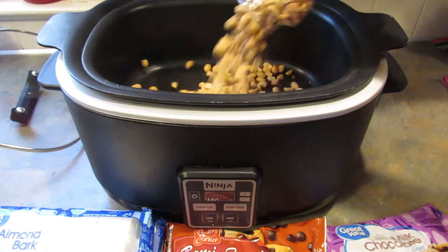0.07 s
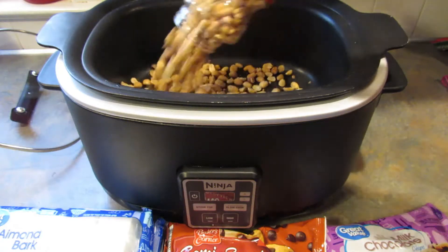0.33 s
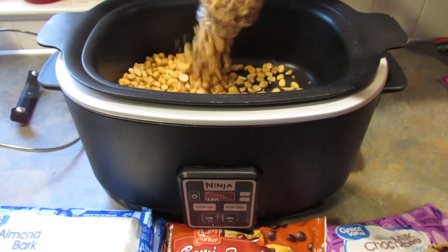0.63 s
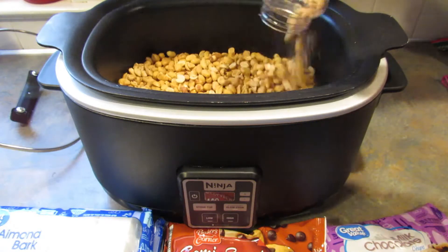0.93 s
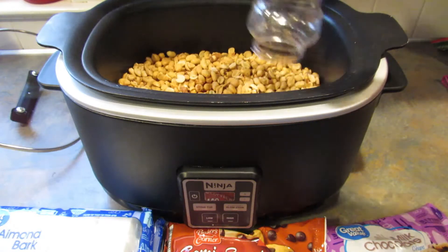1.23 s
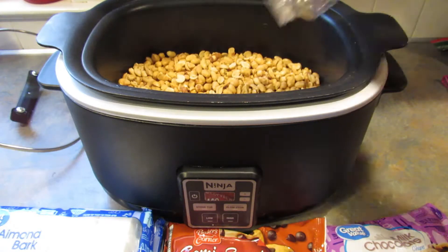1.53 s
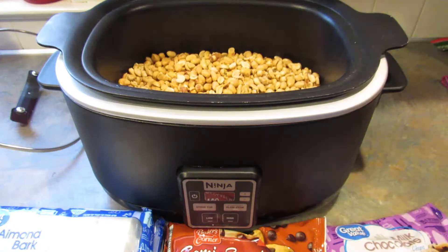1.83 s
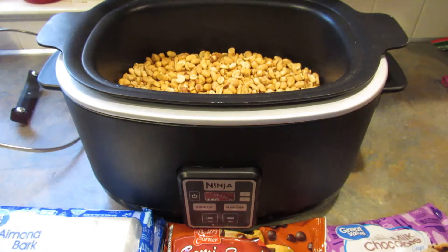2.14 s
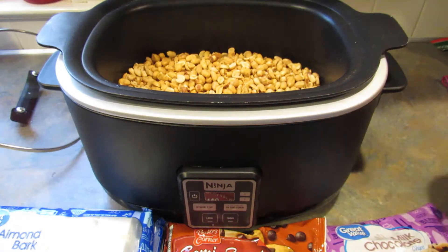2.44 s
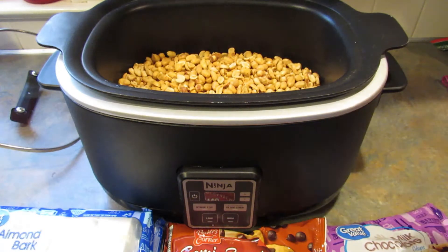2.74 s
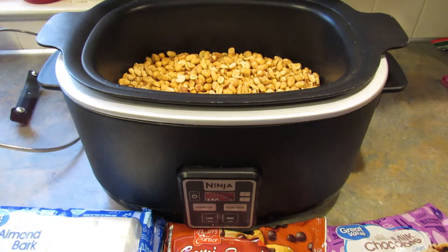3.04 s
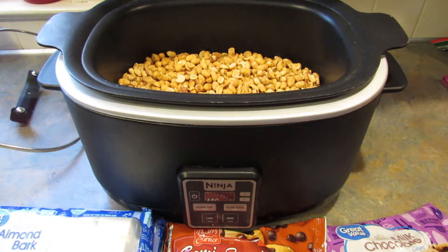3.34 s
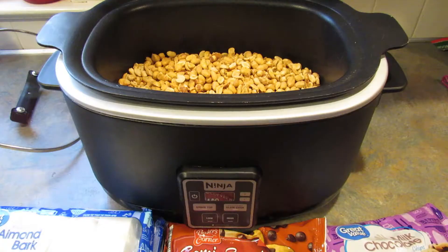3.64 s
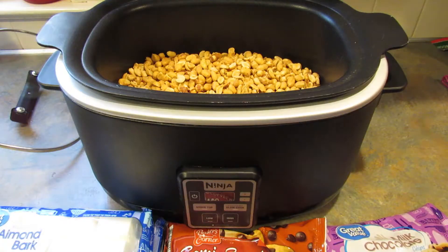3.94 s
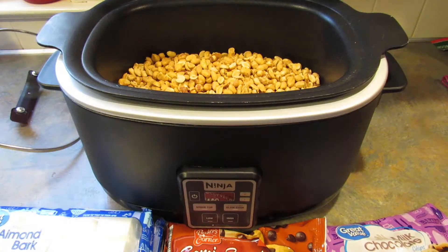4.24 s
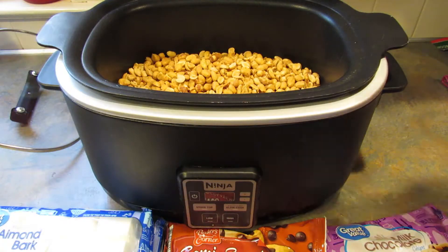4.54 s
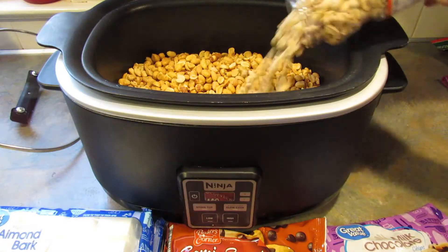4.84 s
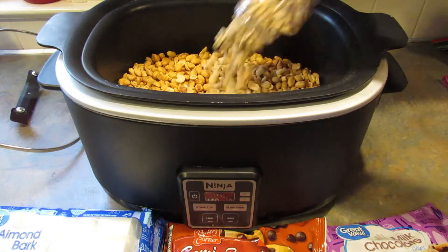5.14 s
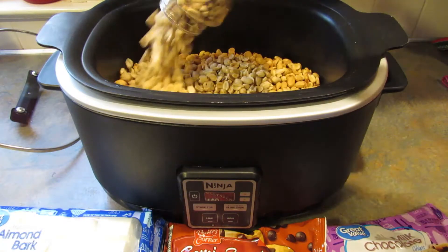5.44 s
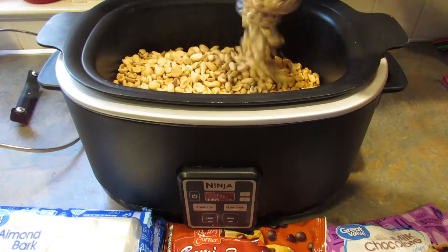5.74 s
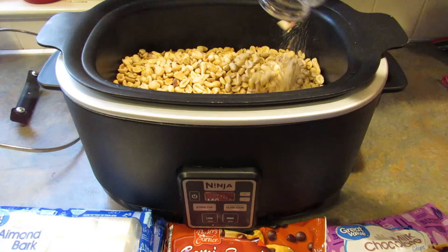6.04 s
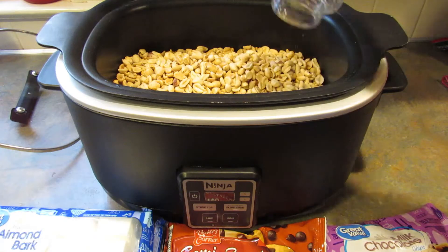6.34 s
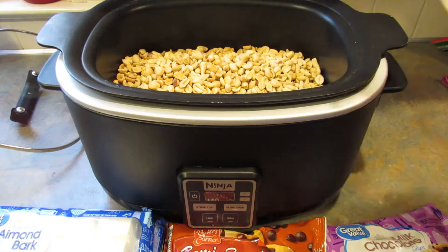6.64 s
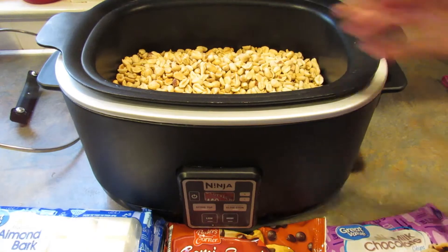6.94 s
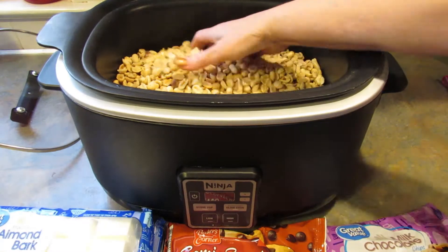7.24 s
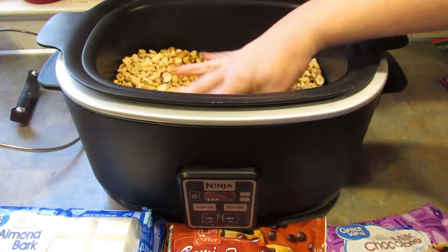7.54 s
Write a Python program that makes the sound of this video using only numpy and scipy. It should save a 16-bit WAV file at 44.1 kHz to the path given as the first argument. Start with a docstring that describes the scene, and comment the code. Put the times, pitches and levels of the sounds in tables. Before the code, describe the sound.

Close to a metal pot in a small, faintly humming kitchen, a stream of peanuts clatters in and trails off. An empty plastic jar is set down with a few hollow knocks, followed by quiet rubbing, plastic clicks and the brief hiss of a seal tearing. More peanuts rush in on top of the first, and finally a hand spreads the heap in short, rustling pushes.

```python
"""Shelled peanuts pour from a jar into a metal cooker pot, drumming on its floor and ringing its wall.
The empty plastic jar knocks on the counter with a hollow boom. Fingers rub the next jar, its lid snaps
and its seal tears with a hiss. The second pour follows, the banked nuts shortening the wall's ring.
Last, a hand spreads the heap. All is heard close to the pot, in a small kitchen with a mains hum."""
import sys
import numpy as np
from scipy import signal
from scipy.fft import rfft, irfft, next_fast_len
from scipy.io import wavfile
from scipy.ndimage import map_coordinates

SR = 44100
rng = np.random.default_rng(int(sys.argv[2]) if len(sys.argv) > 2 else 0)


def output_pcm(signal):
    """Save a mono or channel-first signal as 16-bit PCM at the path in sys.argv[1].

    Samples are clipped to [-1, 1] before scaling.
    """
    pcm = np.clip(np.atleast_2d(signal).T, -1, 1) * 32767
    wavfile.write(sys.argv[1], SR, np.round(pcm).astype(np.int16))


N = 338688
TOUCH_S = 7.143  # the hand lands on the heap
TOP_HZ = 15250  # microphone band limit

# Jars tipped out. Each row: start, fullest moment and running out in seconds, rattle at the fullest in dB,
# swell and fade in dB per second, crisp top re rattle in dB.
POURS = [(-0.08, 0.644, 0.97, -22.5, 10, 78, -1), (4.806, 5.577, 5.985, -22, 13.5, 107.5, -6)]
# Modes of the pot's wall. Each row: frequency in Hz, relative level in dB, T60 in seconds.
WALL_MODES = [(1040, 7, 0.12), (1365, 1, 0.13), (1620, 4.5, 0.08), (2560, -1.5, 0.11), (2840, -3.5, 0.07),
              (3105, -1, 0.042), (4890, -2, 0.025), (7280, -1.5, 0.07)]


def peanuts():
    """Nuts collide in clumps: they drum on the pot's floor, rattle in its hollow and tick on each other."""
    # Collision spectrum. Each row: frequency in Hz, relative density in dB.
    spectrum = [(60, -24), (140, -5), (210, -8.5), (290, -5.5), (345, 5), (410, 1), (480, -11), (690, -20),
                (830, -4.5), (1700, -3.5), (2600, -2.5), (3500, -7.5), (7000, -9.5), (10000, -13.5),
                (15000, -23.5)]
    hail = grains(per_second=3800, scatter_db=3.6, cycles=2.2, spread=.85)
    hail += amp(-2.5) * stereo_noise(N, width=.09)
    clumps = amp(1.4 * wobble(110) + .5 * wobble(30))
    hail = coloured(hail * clumps, spectrum)
    below = lambda hz, edge_hz: 1 / (1 + (hz / edge_hz) ** 8)
    drum = unit(filtered(hail, lambda hz: below(hz, 730)))
    rattle = unit(filtered(hail + pot_air(hail), lambda hz: below(hz, 3670) - below(hz, 490)))
    crisp = unit(filtered(hail, lambda hz: 1 - below(hz, 3280)))
    level, top = np.add(pouring(), spreading())
    ticks = level * rattle + top * crisp
    hand = np.arange(N) / SR >= TOUCH_S  # shoves the whole heap and muffles the floor
    shove = amp(-5.5) * hand * level * burst(N, 132, octaves=0.51, width=0.51)
    floor = amp(-6 - 3.5 * hand) * level * drum
    return ticks + floor + shove + amp(-26) * pot_ring(ticks)


def pouring():
    """Gains of rattle and crisp top: each stream opens, swells, thins once the bulk is out, and dies."""
    # The stream falters at the jar's mouth. Each row: time and half length in seconds, dip in dB.
    stalls = [(1.057, 0.019, 7), (5.148, 0.013, 14)]
    open_s, open_db = 0.086, 9.5  # the first nuts slide over the rim
    thin_s, thin_db = 0.13, 10
    dulling_db_per_db = 0.3  # nuts in a thick stream cushion each other
    settle_db_per_s = 10  # the last nuts roll to rest and lose their top
    t, level, top = np.arange(N) / SR, np.zeros(N), np.zeros(N)
    stall_db = sum(db * np.exp(-((t - s) / half_s) ** 2) for s, half_s, db in stalls)
    for start_s, fullest_s, empty_s, db, swell_db_per_s, fade_db_per_s, crisp_db in POURS:
        opening = ramp(start_s, open_s)
        stream_db = -swell_db_per_s * np.maximum(fullest_s - t, 0) - thin_db * ramp(fullest_s, thin_s)
        ends_db = open_db * (opening - 1) - fade_db_per_s * since(empty_s)
        gain = (t >= start_s) * amp(db + stream_db + ends_db - stall_db)
        top_db = crisp_db - dulling_db_per_db * stream_db - settle_db_per_s * since(empty_s)
        level += gain
        top += gain * opening * amp(top_db)
    return level, top


def spreading():
    """Gains of rattle and crisp top under the hand: each push builds and eases."""
    # Pushes through the heap. Each row: hardest moment in seconds, rattle in dB, top re rattle in dB.
    pushes = [(7.171, -34.5, -8), (7.328, -29.5, 3), (7.52, -41, -7), (7.66, -35.5, -3)]
    rise_db_per_s, fall_db_per_s = 153, 152
    t, levels, tops = np.arange(N) / SR, [], []
    for s, db, crisp_db in pushes:
        gain = (t >= TOUCH_S) * amp(db - rise_db_per_s * np.maximum(s - t, 0) - fall_db_per_s * since(s))
        levels.append(gain)
        tops.append(gain * amp(crisp_db))
    return np.linalg.norm(levels, axis=0), np.linalg.norm(tops, axis=0)


def strikes():
    """A clump chatters against the wall, a single nut cracks once, and the wall rings on."""
    # Clumps hitting the pot. Each row: start in seconds, relative level in dB, centre in Hz, hold in seconds.
    clumps = [(0.047, -6, 6670, 0.012), (0.068, -6.5, 7000, 0.0094), (0.53, -15.5, 2310, 0.02),
              (1.091, -12, 4400, 0.0047), (1.114, -17.5, 5270, 0.008), (1.153, -17.5, 3570, 0.018),
              (1.195, -23.5, 4240, 0.021), (4.879, -17, 7100, 0.014), (4.929, -12.5, 2870, 0.0059),
              (5.121, -12, 1980, 0.013), (5.186, -9.5, 3160, 0.023), (5.264, -13, 2420, 0.014),
              (5.532, -12.5, 2360, 0.0188), (5.897, -13, 2150, 0.0054), (7.149, -17.5, 3480, 0.049),
              (7.454, -12.5, 2960, 0.075), (7.465, -19, 500, 0.0146), (7.509, -10, 7000, 0.0038)]
    # Single hard hits. Each row: start in seconds, relative level in dB, centre in Hz.
    hits = [(0.7433, -7, 6100), (5.586, -7, 2440), (5.7418, -13.5, 2070), (5.9478, -16.5, 3200),
            (6.255, -23, 3700), (6.27, -23, 2800), (7.455, -12, 3070), (7.586, -15.5, 4000)]
    out, t = np.zeros((2, N)), np.arange(SR // 4) / SR
    for s, db, centre_hz, hold_s in clumps:
        fade_db = -60 * np.maximum(t - hold_s, 0) / 0.057
        octaves = np.clip(0.16 * (centre_hz / 1600) ** 2.65, .14, .85)  # harder hits: higher and broader
        add(out, s, amp(db - 13.5 + fade_db) * burst(len(t), centre_hz, octaves, width=0.31))
    crack = amp(-60 * t / 0.0027) + amp(-2.5 - 60 * t / 0.039)
    for s, db, centre_hz in hits:
        add(out, s, amp(db - 9.5) * crack * burst(len(t), centre_hz, octaves=0.72, width=0.15))
    banked = np.arange(N) / SR > POURS[1][0]  # nuts damp the wall from the second pour on
    return out + amp(-2) * (pot_ring(out * ~banked) + pot_ring(out * banked, t60_scale=0.35))


def wall_slides():
    """Nuts slide along the wall and swell one mode in uneven nudges; it then dies at its own speed."""
    # Each row: start and length in seconds, level in dB, mode frequency in Hz.
    slides = [(0.44, 0.12, -30, 2560), (0.813, 0.15, -34, 1030), (1.09, 0.15, -43, 1045),
              (7.465, 0.05, -24.5, 1601), (7.585, 0.008, -30, 1607)]
    out, t = np.zeros(N), np.arange(N) / SR
    mode_hz, _, mode_t60_s = np.transpose(WALL_MODES)
    for s, length_s, db, hz in slides:
        envelope = stroke(s, length_s, rise_s=length_s / 2, t60_s=np.interp(hz, mode_hz, mode_t60_s))
        out += amp(db) * envelope * np.sin(2 * np.pi * hz * t + 1.2 * wobble(45))
    return out * amp(2.5 * wobble(60))


def pot_ring(x, t60_scale=1):
    """The wall's modes, driven by x; loose nuts blur their pitch."""
    t = np.arange(SR // 2) / SR
    free, damped = np.zeros((2, len(t)))
    for hz, db, t60_s in WALL_MODES:
        tone = np.cos(2 * np.pi * hz * t + .5 * wobble(110)[:len(t)])
        free += amp(db - 60 * t / t60_s) * tone
        damped += amp(db - 60 * t / (t60_s * t60_scale)) * tone
    return signal.fftconvolve(x, damped[None] / np.linalg.norm(free), axes=1)[:, :N]


def pot_air(x):
    """Each resonance of the air in the pot comes and goes as the nuts land in new places."""
    # Each entry: an air resonance in Hz.
    modes_hz = [1392, 1768, 2096, 2585]
    width_hz = 90
    return sum(amp(-3 + 4 * wobble(9)) * resonate(x, [(hz, width_hz, 0)]) for hz in modes_hz)


def jar_knocks(boom_hz=345, boom_s=0.05):
    """The empty jar booms at one pitch until the hand damps it; the counter thumps and the rim clacks."""
    # Bumps on the counter. Each row: start in seconds, boom in dB, thump in dB, thump pitch in Hz,
    # clack in dB, clack pitch ratio.
    knocks = [(2.328, -36.5, -35, 189, -36, 0.94), (2.369, -25, -30, 130, -31, 0.9),
              (2.544, -9, -34, 190, -21, 1.04), (2.655, -9, -24.5, 157, -12, 0.984),
              (2.674, -42, -21.5, 240, -16, 0.73), (6.766, -57.5, -27.5, 195, -39.5, 0.6),
              (6.848, -39.5, -29.5, 179, -32, 0.98)]
    # Resonances of the clack. Each row: frequency and width in Hz, gain per pass in dB.
    clack_modes = [(538, 260, 5), (805, 60, 4.5), (1140, 207, 5.5), (1500, 520, 1.5), (2100, 500, 1),
                   (3850, 1630, -4.5), (5500, 1360, -9), (8200, 6400, -3)]
    low, clacks, t = np.zeros((2, N)), np.zeros((2, N)), np.arange(SR // 4) / SR
    swell = (1 - np.exp(-t / 0.0012)) * np.exp(-(t / boom_s) ** 3.7)
    for s, boom_db, thump_db, thump_hz, clack_db, pitch in knocks:
        add(low, s, amp(boom_db) * swell * np.sin(2 * np.pi * boom_hz * t))
        add(low, s, amp(thump_db - 60 * t / 0.14) * np.sin(2 * np.pi * thump_hz * t))
        add(low, s, amp(thump_db - 7 - 60 * t / 0.4) * burst(len(t), thump_hz, octaves=0.51, width=0.64))
        modes = [(hz * pitch, width_hz, db) for hz, width_hz, db in clack_modes]
        clack = unit(resonate(resonate(stereo_noise(len(t), width=0.45), modes), modes))
        add(clacks, s, amp(clack_db - 60 * t / 0.074) * clack)
    clacks = filtered(clacks, lambda hz: 1 / np.sqrt(1 + (hz / 9000) ** 6))  # soft plastic: little top
    return low, clacks * amp([[-1.5], [1.5]])


def finger_rubs():
    """Fingers take hold of a jar, rub it with an uneven grip and let go."""
    # Each row: start and length in seconds, level in dB.
    rubs = [(1.862, 0.22, -56), (3.11, 0.066, -39.5), (3.277, 0.526, -44.5), (4.096, 0.12, -44),
            (4.462, 0.14, -51.5), (4.718, 0.07, -42), (6.817, 0.097, -50)]
    # Friction spectrum. Each row: frequency in Hz, relative density in dB.
    spectrum = [(340, 2), (690, -5), (950, 5.5), (2200, 4.5), (3500, -2), (8000, -3.5), (15000, -13.5)]
    friction = grains(per_second=2500, scatter_db=3, cycles=1, spread=.6) + stereo_noise(N, width=.2)
    grip = amp(2 * wobble(45))
    level = sum(amp(db) * stroke(s, length_s, rise_s=0.036, t60_s=0.24) for s, length_s, db in rubs)
    return level * unit(coloured(friction * grip, spectrum))


def seal_peel(start_s=3.478, length_s=0.31, sag_db_per_s=6.5):
    """The seal gives at once with a hiss, then peels ever more easily."""
    # Hiss spectrum. Each row: frequency in Hz, relative density in dB.
    spectrum = [(690, -29.5), (1000, -12), (2200, 4), (3800, -10.5), (8000, 0), (15000, -9.5)]
    envelope = stroke(start_s, length_s, rise_s=0.005, t60_s=0.064)
    hiss = unit(coloured(stereo_noise(N, width=1), spectrum))
    return amp(-38.5 - sag_db_per_s * since(start_s)) * envelope * hiss


def jar_snaps(crack_t60_s=0.003, flutter_t60_s=0.066):
    """The plastic cracks sharply, flutters and rings the full jar's shell."""
    # Snaps and taps of jar, lid and seal. Each row: start in seconds, relative level in dB, centre in Hz,
    # breadth in octaves.
    snaps = [(2.89, -26.5, 1850, 0.3), (3.086, -25.5, 7060, 7.2), (3.135, -20.5, 3950, 1.8),
             (3.158, -14.5, 3520, 1.4), (3.478, -9, 7000, 4), (3.877, -19.5, 1400, 1.3),
             (3.93, -19.5, 1190, 1.9), (4.048, -13, 4400, 1.2), (4.054, -14.5, 2720, 0.15),
             (4.153, -25.5, 450, 1.7), (4.452, -29, 1850, 0.66), (4.552, -22, 3630, 0.73),
             (4.586, -23, 2000, 0.5), (4.725, -21.5, 1850, 1.04), (4.837, -17, 2190, 0.5),
             (6.672, -32.5, 4560, 0.069), (6.831, -28.5, 2280, 0.23), (6.871, -28, 1950, 6.6),
             (6.92, -29, 2370, 0.027)]
    # Resonances of the full jar. Each row: frequency and width in Hz, gain in dB.
    shell_modes = [(1150, 58, 8), (2660, 89, 0.5), (2930, 54, -4), (4510, 27, -14), (6060, 330, -2.5)]
    out, t = np.zeros((2, N)), np.arange(SR // 4) / SR
    decay = amp(-60 * t / crack_t60_s) + amp(-60 * t / flutter_t60_s)
    for s, db, centre_hz, octaves in snaps:
        add(out, s, amp(db - 13) * decay * burst(len(t), centre_hz, octaves, width=0.5))
    return out + resonate(out, shell_modes)


def kitchen(x, predelay_samples=200):
    """Reverberation in which each frequency dies at its own speed."""
    # Room decay. Each row: frequency in Hz, T60 in seconds.
    t60_s = [(600, 0.47), (1600, 0.56), (12000, 0.37)]
    hz, t, bins = signal.stft(stereo_noise(SR // 2, width=0.29), SR, nperseg=256)
    tail = signal.istft(bins * amp(-60 * t / along(t60_s, hz)[:, None]), SR, nperseg=256)[1]
    tail = np.pad(tail / np.linalg.norm(tail[0]), ((0, 0), (predelay_samples, 0)))
    return signal.fftconvolve(x, tail, axes=1)[:, :N]


def background():
    """An appliance hums over faint room air."""
    # Hum partials; the close pair throbs. Each row: frequency in Hz, rms level in dB.
    partials = [(64.1, -53.5), (120, -48), (127.4, -62.5), (240, -63.5)]
    # Room air spectrum. Each row: frequency in Hz, relative density in dB.
    spectrum = [(30, -22), (130, -12), (400, -10), (690, -26), (850, -19.5), (4000, -36), (10000, -36),
                (15000, -44)]
    t = np.arange(N) / SR
    hum = sum(amp(db) * np.sin(2 * np.pi * hz * t + 0.394 * wobble(4.3)) for hz, db in partials)
    air = unit(coloured(stereo_noise(N, width=1), spectrum))
    return np.sqrt(2) * hum + amp(-51) * air


def grains(per_second, scatter_db, cycles, spread):
    """Tiny collisions, each a damped sine with its own pitch, size and place; white on average."""
    when, pitch, strength, place = rng.random((int(per_second * N / SR), 4)).T[:, :, None]
    hz, t = 150 * 100 ** pitch, np.arange(160) / SR
    life_s = np.minimum(cycles / hz, t[-1] / 3)
    size = amp(-scatter_db * np.log(1 - .98 * strength)) * np.sqrt(hz / life_s)
    pings = size * np.sin(2 * np.pi * hz * t) * np.exp(-t / life_s)
    pan = spread * (2 * place - 1) * np.sqrt(hz / TOP_HZ)  # short waves are the most directional
    index = ((when * N).astype(int) + np.arange(len(t))).ravel()
    channels = [np.bincount(index, (pings * (1 + side * pan)).ravel())[:N] for side in (-1, 1)]
    return unit(np.array(channels))


def burst(size, centre_hz, octaves, width):
    """Stereo noise of rms 1 in a spectral hump."""
    hump = lambda hz: 1 / (1 + (np.log2((hz + 1) / centre_hz) / octaves) ** 2)
    return unit(filtered(stereo_noise(size, width), lambda hz: hump(hz) / np.sqrt(1 + (hz / 11000) ** 4)))


def stereo_noise(size, width):
    """White noise; width is the ratio of side to mid."""
    mid, side = rng.standard_normal((2, size))
    return np.array([mid + width * side, mid - width * side])


def wobble(knots_per_s):
    """A smooth random curve."""
    return map_coordinates(rng.standard_normal(4096), [np.arange(N) * knots_per_s / SR], mode="wrap")


def filtered(x, response):
    """x times a response of frequency."""
    n = x.shape[-1]
    m = next_fast_len(n + SR // 4)
    return irfft(rfft(x, m) * response(np.fft.rfftfreq(m, 1 / SR)), m)[..., :n]


def coloured(x, spectrum):
    """x shaped by (Hz, dB) points."""
    return filtered(x, lambda hz: amp(along(spectrum, hz)))


def resonate(x, modes):
    """x through a set of (Hz, width Hz, dB) resonances."""
    band = lambda f, hz, width_hz: 1j * f * width_hz / (hz * hz - f * f + 1j * f * width_hz)
    return filtered(x, lambda f: sum(amp(db) * band(f, hz, width_hz) for hz, width_hz, db in modes))


def along(points, hz):
    """(Hz, value) points read on a log axis."""
    knots_hz, values = np.transpose(points)
    return np.interp(np.log(hz + 1), np.log(knots_hz), values)


def stroke(start_s, length_s, rise_s, t60_s):
    """Attack, hold and release."""
    return ramp(start_s, rise_s) * amp(-60 * since(start_s + length_s) / t60_s)


def ramp(start_s, length_s):
    """Linear rise from 0 to 1."""
    return np.minimum(since(start_s) / length_s, 1)


def since(start_s):
    """Seconds since a moment, 0 before it."""
    return np.maximum(np.arange(N) / SR - start_s, 0)


def add(track, start_s, sound):
    """Mix a sound into a track."""
    part = track[..., round(start_s * SR):][..., :sound.shape[-1]]
    part += sound[..., :part.shape[-1]]


def amp(db):
    """Decibels to gain."""
    return 10 ** (np.asarray(db) / 20)


def unit(x):
    """Scaled to rms 1."""
    return x / np.sqrt(np.mean(x ** 2) + 1e-20)


def scene():
    """The pot in the middle, the jars handled a little to the right, all in the humming kitchen."""
    pot = peanuts() + strikes() + wall_slides()
    handling = (finger_rubs() + seal_peel() + jar_snaps()) * amp([[-.8], [.8]])
    booms, clacks = jar_knocks()
    room = kitchen(amp(-9) * pot + amp(-8.5) * handling + amp(-17.5) * booms + amp(-10) * clacks)
    return pot + handling + booms + clacks + room + background()


def record(dry):
    """A band-limited microphone pair narrows the image most near 2 kHz and leans right in the bass."""
    # Stereo width. Each row: frequency in Hz, side gain in dB.
    side_db = [(600, 2), (2000, -11), (8000, -3)]
    # Balance. Each row: frequency in Hz, left re right in dB.
    tilt_db = [(300, -4), (1200, -1), (12000, 0)]
    # Phase between channels. Each row: frequency in Hz, lead of the left in radians.
    lead_rad = [(60, 2.05), (260, 0.64), (1600, 0.046)]
    sign = np.array([[.5], [-.5]])
    stereo = dry.mean(axis=0) + sign * coloured(dry[0] - dry[1], side_db)
    mismatch = lambda hz: amp(sign * along(tilt_db, hz)) * np.exp(1j * sign * along(lead_rad, hz))
    return filtered(stereo, lambda hz: mismatch(hz) * (hz < TOP_HZ))


dry = scene()
out = record(dry)
output_pcm(out)
```